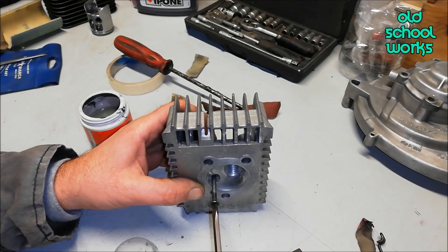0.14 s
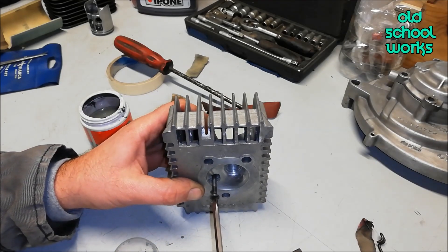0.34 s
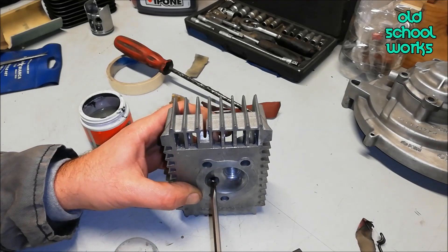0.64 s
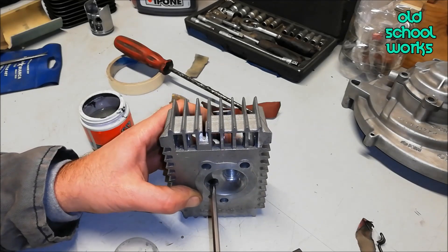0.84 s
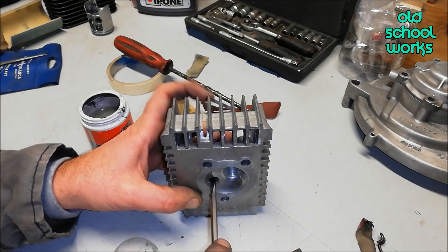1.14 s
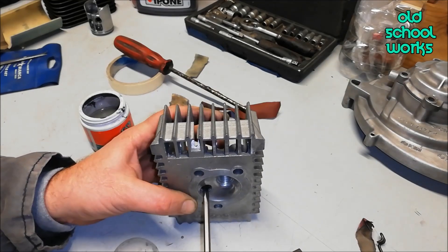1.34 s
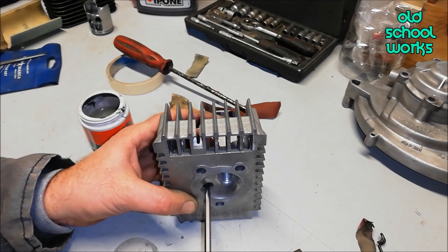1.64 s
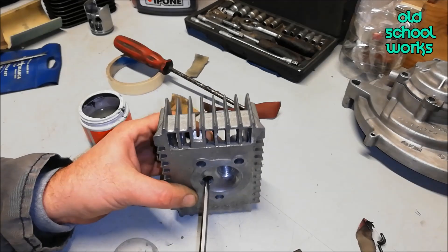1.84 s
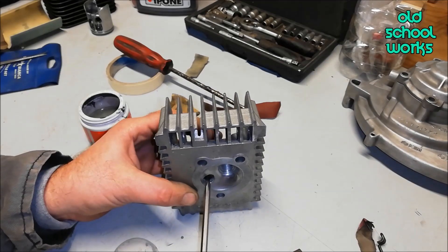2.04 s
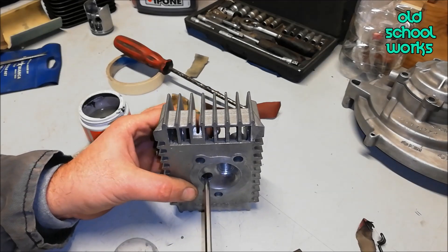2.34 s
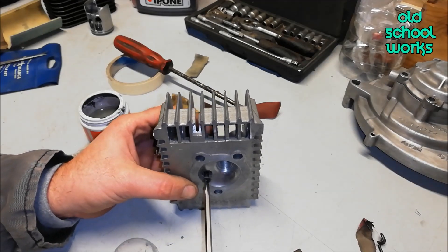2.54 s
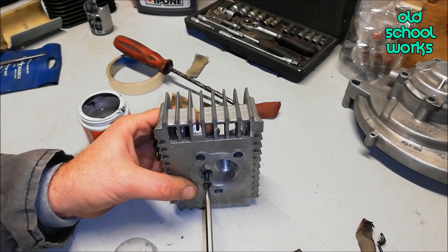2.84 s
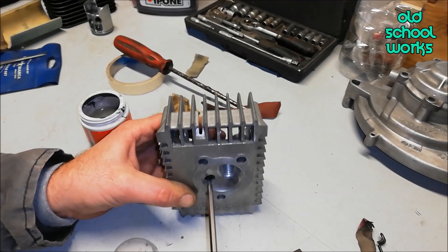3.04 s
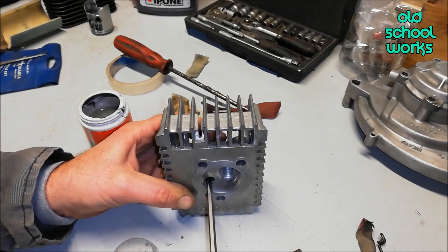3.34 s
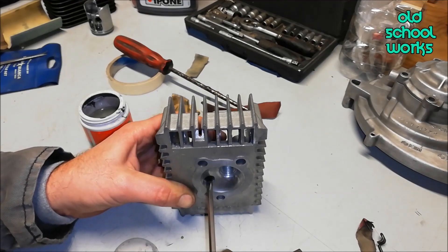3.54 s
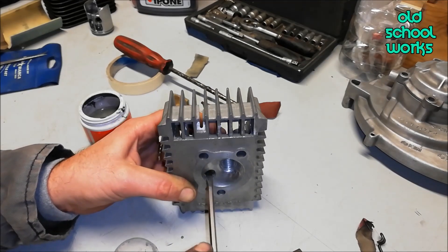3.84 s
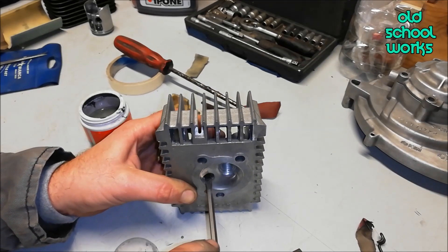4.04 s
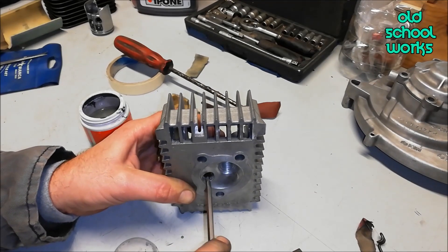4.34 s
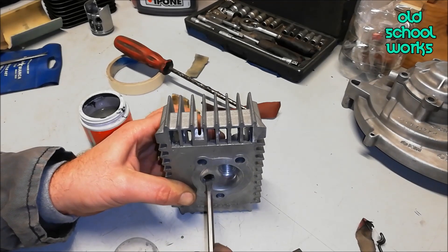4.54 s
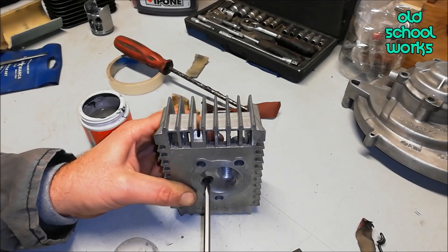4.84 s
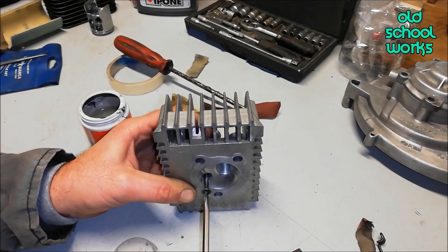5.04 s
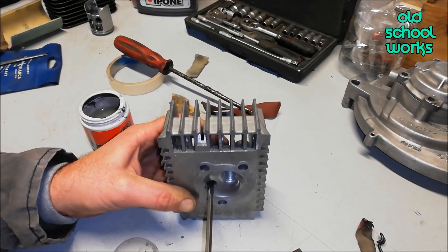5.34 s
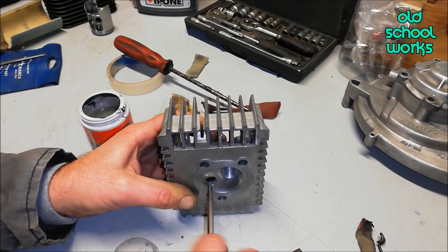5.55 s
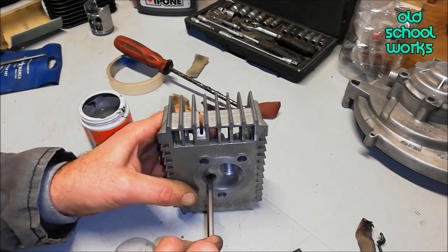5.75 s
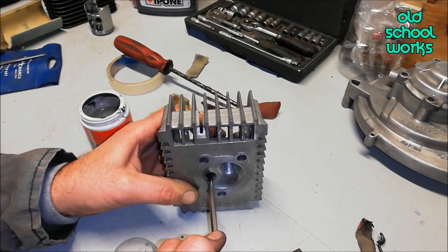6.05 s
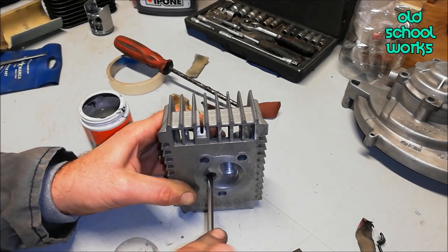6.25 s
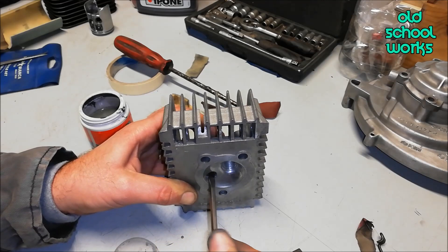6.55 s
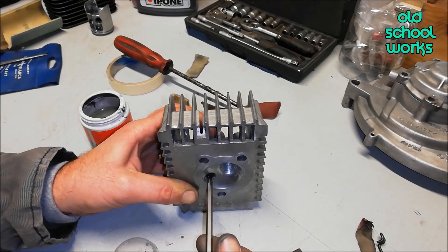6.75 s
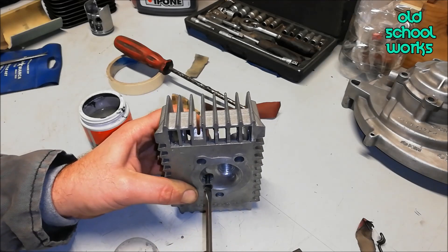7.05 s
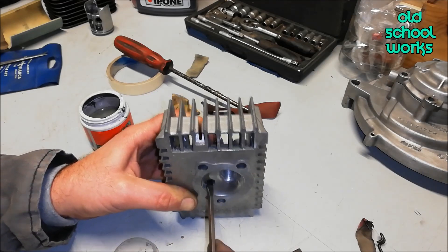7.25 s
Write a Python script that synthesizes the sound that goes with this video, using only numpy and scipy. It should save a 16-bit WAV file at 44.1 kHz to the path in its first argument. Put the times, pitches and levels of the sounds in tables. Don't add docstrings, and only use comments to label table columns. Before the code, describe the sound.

Close stereo pickup at a workbench: a finned metal casting is handled with light scrapes, ticks, small squeaks and woody knocks. A hard metallic clack opens a run of short, uneven gritty twists as a valve is ground in paste. Midway comes another clack and a bench thump, then more grinding and a final rattling clack with a bright ring. A far engine and soft traffic rumble lie behind.

```python
import sys
import numpy as np
from scipy import signal
from scipy.io import wavfile
from scipy.ndimage import uniform_filter1d

SR = 44100
rng = np.random.default_rng(int(sys.argv[2]) if len(sys.argv) > 2 else 0)


def digitize_waveform(pressure):
    field = np.atleast_2d(pressure).T
    bounded = np.clip(field, -1, 1)
    quanta = np.round(bounded * 32767).astype(np.int16)
    wavfile.write(sys.argv[1], SR, quanta)


def amplitude_ratio(level_db):
    exponent = np.asarray(level_db, float) / 20
    return 10 ** exponent


N = 326781

# (pitch_hz, width_hz, level_db)
VALVE_MODES = [(8220, 45, -8), (8420, 90, -2), (8670, 110, -6), (8880, 120, -8), (9080, 60, -5),
               (9350, 200, -15), (9600, 50, -8), (9810, 32, 4.5), (10095, 45, -3), (10550, 200, -10),
               (11100, 260, -11)]
# (pitch_hz, width_hz, level_db)
FIN_MODES = [(1340, 120, -9), (2200, 120, -9), (2510, 80, -10), (2860, 60, -6), (3580, 80, -7),
             (4000, 180, -9), (4430, 100, -10), (5070, 110, -11), (5790, 60, -4), (5960, 50, 0),
             (6290, 60, -4), (6430, 60, -4), (7270, 170, -5)]
# (pitch_hz, width_hz, level_db)
BENCH_MODES = [(92, 52, -4), (133.7, 30.3, -3), (217, 26, -7), (280, 38.5, 3.5), (397, 52, 3),
               (470, 39, -3), (693, 32, -2.5), (994, 65, 3), (1100, 84, -11.5), (1245, 67, -3)]
# (pitch_hz, level_db per Hz)
PASTE_HISS = [(590, -56), (1000, -12), (2480, -10.5), (2920, -14), (6100, -4.5), (7400, -11.5), (8400, 3),
              (10400, -14), (12200, -10), (15700, -10.5)]
# (pitch_hz, level_db per Hz)
DRY_HISS = [(880, -65), (1500, -3), (1770, -11.5), (2220, -14.5), (3070, -3.5), (3930, -3.5), (4550, -2.5),
            (8290, 3.5), (15700, -38.5)]
# (pitch_hz, level_db per Hz)
BENCH_THUD = [(47, -23), (80, -13), (454, 12.5), (604, -0.5), (952, 6.5), (1320, -11), (1680, -17),
              (2400, -15), (3120, -119), (5280, -120)]

# (modes, broad sound, broad sound dB, factor that widens the modes)
PASTED_VALVE = (VALVE_MODES, PASTE_HISS, -1.0, 1.0)
BARE_VALVE = (VALVE_MODES, DRY_HISS, 2.0, 1.5)
FINS = (FIN_MODES, DRY_HISS, -4, 1.0)
BENCH_TOP = (BENCH_MODES, BENCH_THUD, -1.5, 1.3)


def evened(x):
    return x / np.sqrt(np.mean(x ** 2) + 1e-20)


def slow_noise(window):
    return evened(uniform_filter1d(uniform_filter1d(rng.standard_normal(N), window), window))


def read(points, hz):
    f, value = np.transpose(points)
    return np.interp(np.log(hz + 1), np.log(f + 1), value)


def add(mix, s, sound):
    part = mix[round(s * SR):][:len(sound)]
    part += sound[:len(part)]


def highpass(x, hz, order=2):
    return signal.lfilter(*signal.butter(order, hz, "high", fs=SR), x)


def causal(gain, size):
    return np.fft.ifft(np.exp(np.conj(signal.hilbert(np.log(gain + 1e-5))))).real[:size]


def colour(points, size=2048):
    hz = abs(np.fft.fftfreq(4 * size, 1 / SR))
    return causal(amplitude_ratio(read(points, hz)), size)


def body(peaks, broad, broad_db, widen, vary_db=6.0):
    hz = abs(np.fft.fftfreq(16384, 1 / SR))
    modes = 0
    for f, width, db in peaks:
        power = amplitude_ratio(2 * (db + vary_db * rng.standard_normal()))
        modes = modes + power / (((hz ** 2 - f ** 2) / (f * width * widen)) ** 2 + (hz / f) ** 2)
    hiss = amplitude_ratio(2 * read(broad, hz))
    power = modes / modes.mean() + amplitude_ratio(2 * broad_db) * hiss / hiss.mean()
    response = causal(evened(np.sqrt(power)), size=4096)
    return response / np.linalg.norm(response)


def grit(per_s, spread_db, lump_db, lump_s):
    size = amplitude_ratio(spread_db * np.minimum(rng.exponential(1, N), 4)) * rng.choice([-1., 1.], N)
    lumps = signal.oaconvolve(rng.standard_normal(N), np.hanning(round(lump_s * SR)), "same")
    strikes = rng.random(N) < per_s / SR
    return evened(size * strikes * amplitude_ratio(lump_db * evened(lumps)))


def stroke(row, release_s, depth_db, gain_db):
    start, length, first_db, last_db, *second_db = row
    bite_s = 0.014
    s = start + np.cumsum([0, bite_s, max(length - bite_s, .001), release_s])
    db = np.array([first_db + depth_db, first_db, last_db, last_db + depth_db])
    lean = gain_db * np.array([-0.46, -1.12, -0.18, -0.29])
    return np.transpose([s, db] + [db + d + lean for d in second_db])


def rub(strokes, grains, parts, roam_s):
    t, out = np.arange(N) / SR, np.zeros((2, N))
    roam = t / roam_s + .5 * slow_noise(4000)
    forces = np.zeros((len(parts), N))
    for points in strokes:
        s, *levels = np.transpose(points)
        forces = np.maximum(forces, [amplitude_ratio(np.interp(t, s, db, -200, -200)) for db in levels])
    for place in range(3):
        here = (1 + np.cos(2 * np.pi * (roam + place / 3))) / np.sqrt(9 / 2)
        sound = np.zeros(N)
        for k, (force, part) in enumerate(zip(forces, parts)):
            own_grains = np.roll(grains, 4096 * k)
            sound += signal.oaconvolve(force * here * own_grains, body(*part))[:N]
        out += ports(sound, side_db=0.5)
    return out


def grinding():
    # (start_s, length_s, first_db, last_db, fins against the valve in dB)
    twists = [(3.307, 0.067, -77, -61, -21), (3.381, 0.24, -45, -42, -20), (3.669, 0.26, -45, -45.5, -10.5),
              (3.98, 0.12, -60.5, -68.5, -5), (4.213, 0.28, -53.5, -44, -5.5),
              (4.489, 0.32, -45, -54, -1.5), (4.853, 0.071, -64, -66, 2), (5.342, 0.31, -46, -41.5, -5.5),
              (5.625, 0.15, -41.5, -57.5, -3.5), (5.789, 0.12, -51.5, -44, -12),
              (6.127, 0.21, -56, -47, -13.5), (6.363, 0.27, -54.5, -55.5, 1.5),
              (6.594, 0.19, -54.5, -60.5, -12), (6.912, 0.16, -59, -58.5, 2.5)]
    strokes = [stroke(row, release_s=0.065, depth_db=-12.5, gain_db=4.5) for row in twists]
    grains = grit(per_s=5000, spread_db=2.0, lump_db=2.0, lump_s=0.016)
    return seated(rub(strokes, grains, [PASTED_VALVE, FINS], roam_s=0.37))


def seated(x):
    # (time_s, rim_db, fizz_db)
    fit = [(3.38, 3.5, 0), (3.6, 1.5, -1), (3.7, 1, -1), (3.95, 3.5, -4), (4.22, 7.5, -1), (4.5, 0, -1.5),
           (4.8, -3, -6), (5.35, 0, -1), (5.6, 1, 0), (5.8, 4.5, -2), (5.97, -5, -7), (6.13, 6.5, 1),
           (6.35, 3, 1), (6.55, 6, 0), (6.75, 0, -2), (6.92, -6, -7), (7.101, -1, -2)]
    s, rim_db, fizz_db = np.transpose(fit)
    t = np.arange(N) / SR

    def above(hz):
        return signal.oaconvolve(x, signal.firwin(255, hz, pass_zero=False, fs=SR)[None], "same", axes=1)

    rim, fizz = above(9350), above(11600)
    rim_gain, fizz_gain = amplitude_ratio(np.interp(t, s, rim_db)), amplitude_ratio(np.interp(t, s, fizz_db))
    return x - rim + rim_gain * (rim - fizz) + fizz_gain * fizz


def clacks():
    # (time_s, peak_db, ring_db, low_blow_db, freedom to ring as a factor)
    landings = [
        (1.2081, -38.5, 15, -16, 1),
        (3.056, -5, -9, -32, 0.63),
        (5.3025, -8.5, -6.5, -38, 0.38),
        (7.336, -5.5, -3, -3, 0.43),
    ]
    # (pitch_hz, level_db, time to fade by 60 dB in s)
    rings = [
        [(2778, -18, .12), (3564, -8, .15), (4000, -13, .05), (4425, -6, .06), (5965, -13, .11),
         (6288, -6, .14), (6433, 0, .06), (7477, -13, .13), (8210, -14, .11), (11770, -18, .1)],
        [(1050, -5, .05), (2200, -3, .05), (2536, -7, .2), (2860, -10, .07), (5792, -16, .25), (5965, 0, .12),
         (6288, -9, .15), (7354, -14, .18), (8220, -10, .2), (8414, -19, .22)],
        [(2848, -14, .15), (2200, -3, .05), (1300, -8, .05), (5965, -7, .12), (6288, -10, .1), (7477, -17, .12),
         (8215, -3, .4), (9033, -13, .13)],
        [(1090, -3, .09), (1420, -6, .05), (2600, -4, .04), (2860, -4, .16), (4161, -8, .08), (5039, -8, .1),
         (5965, -5, .08), (6288, -17, .14), (8215, -4, .55), (9798, -5, .1), (11300, -16, .06),
         (13160, -20, .07)],
    ]
    # (pitch_hz, level_db per Hz)
    crack_tone = [(350, 1), (700, 6.5), (1200, 6), (2400, 8), (3600, -1), (6000, 1), (8000, 0.5),
                  (10500, -6.5), (13500, -44), (15700, -14)]
    bench = body(*BENCH_TOP)
    out, t = np.zeros((2, N)), np.arange(SR // 3) / SR
    for (s, db, ring_db, low_db, free), modes in zip(landings, rings):
        fade = np.exp(-t / 0.0047) + 0.053 * np.exp(-t / 0.069)
        burst = rng.standard_normal(len(t)) * fade * (1 - np.exp(-t / 0.0002))
        burst[[0, 20, 60]] += [4, -6, 5]
        crack = signal.oaconvolve(burst, colour(crack_tone))[:len(t)]
        chatter = uniform_filter1d(rng.standard_normal((len(modes), len(t))), 160, axis=1)
        chatter = amplitude_ratio(3.8 * evened(chatter) * np.exp(-t / 0.14))
        ring = np.zeros(len(t))
        for (f, mode_db, t60), shake in zip(modes, chatter):
            fading = amplitude_ratio(mode_db - 60 * t / (free * min(t60, .8)))
            ring += shake * fading * np.sin(2 * np.pi * (f * t + rng.random()))
        ring = ring * (1 - np.exp(-t / 0.0006)) * signal.windows.tukey(2 * len(t), .3)[len(t):]
        landing = np.zeros(N)
        add(landing, s, amplitude_ratio(db) * (crack / abs(crack).max() + amplitude_ratio(ring_db) * ring / abs(ring).max()))
        add(landing, s, amplitude_ratio(db + low_db) * bench / abs(bench).max())
        out += ports(landing, side_db=-2.0)
    return out


def stem():
    # (time_s, level_db, time to fade by 60 dB in s)
    free_rings = [
        (.812, -60, 1),
        (3.057, -37, 0.94),
        (5.303, -38.5, 0.54),
        (7.337, -33.5, 0.51),
    ]
    out, t = np.zeros(N), np.arange(SR // 3) / SR
    grip = np.cos(np.pi / 2 * t / t[-1]) * np.minimum(t / 0.027, 1)
    for s, db, t60 in free_rings:
        add(out, s, amplitude_ratio(db - 60 * t / t60) * np.sin(2 * np.pi * 3413 * t) * grip)
    return out


def sliding():
    # (start_s, length_s, first_db, last_db, valve against the fins in dB)
    slides = [(0.12, 0.3, -73.5, -61, 1), (0.296, 0.27, -58.5, -61.5, -4.5), (0.495, 0.16, -54, -57, -5),
              (0.629, 0.18, -54, -49.5, -11), (0.9, 0.055, -70, -63, -3), (1.097, 0.12, -74, -67.5, 15),
              (1.556, 0.22, -73, -67, -8), (1.818, 0.15, -70.5, -59.5, -9), (1.963, 0.12, -72, -71, -11),
              (2.41, 0.18, -76, -80, 3), (2.561, 0.093, -54.5, -49.5, -3.5), (2.62, 0.15, -69, -66, -6),
              (2.965, 0.071, -64, -29.5, -26), (3.078, 0.12, -48, -61, -43), (4.922, 0.1, -67, -47.5, 1),
              (5.02, 0.15, -60.5, -84.5, 13), (5.163, 0.14, -65.5, -39, 0.5), (7.283, 0.061, -50, -40, 0)]
    strokes = [stroke(row, release_s=0.035, depth_db=-15, gain_db=-1.7) for row in slides]
    grains = grit(per_s=7000, spread_db=2.5, lump_db=1.5, lump_s=0.021)
    return rub(strokes, grains, [FINS, BARE_VALVE], roam_s=0.55)


def squeaks():
    # (start_s, length_s, pitch_hz, width_hz)
    songs = [(.147, .018, 4650, 120), (.26, .12, 8300, 150), (.42, .17, 6410, 40), (.5, .08, 8250, 150),
             (.5, .1, 4790, 41), (.66, .14, 8580, 120), (.68, .14, 3980, 140), (.72, .1, 7200, 190),
             (.74, .1, 272, 16), (.915, .06, 6350, 60), (.93, .045, 2780, 60), (.93, .04, 4430, 80),
             (.88, .13, 3413, 15), (1.26, .64, 254, 9), (1.3, .18, 7000, 80), (1.565, .065, 4900, 40),
             (1.57, .03, 8150, 60), (1.58, .05, 2530, 50), (1.629, .01, 7200, 300), (1.755, .03, 2530, 50),
             (1.85, .16, 2530, 60), (1.9, .06, 2860, 50), (1.92, .079, 220, 73), (1.93, .08, 8250, 50),
             (1.93, .08, 9150, 50), (1.93, .16, 5960, 50), (3.42, .2, 9810, 30), (3.44, .12, 1060, 60),
             (3.53, .11, 8300, 250), (3.6, .35, 255, 15), (3.87, .14, 8400, 120), (4.23, .2, 8300, 200),
             (4.68, .28, 140, 12), (4.965, .1, 2160, 160), (5.36, .14, 8350, 80), (5.57, .08, 8860, 120),
             (5.83, .1, 8400, 300), (6.13, .65, 9800, 35), (6.91, .23, 2080, 200), (7.345, .06, 2870, 40),
             (7.286, .05, 5960, 60), (7.308, .028, 8220, 60), (2.575, .1, 5960, 50), (2.58, .09, 2530, 80),
             (2.67, .1, 5960, 50), (4.4, .15, 4450, 60), (6.2, .2, 6290, 60), (5.24, .07, 2200, 300),
             (5.24, .07, 2860, 150), (2.43, .04, 8420, 80), (2.5, .05, 8420, 80), (2.42, .14, 5960, 50)]
    song_db = [-59, -68, -60, -54, -61, -52.5, -59, -58, -46.5, -62, -68, -64, -64, -57.5, -71, -62.5, -62,
               -68, -50, -65, -62, -55, -38, -67, -68, -74, -64, -61, -47, -62.5, -42.5, -50.5, -49, -46,
               -48.5, -47, -45.5, -59, -57, -56, -45, -42, -48.5, -56, -66, -58, -54, -50, -47, -66, -66,
               -72]
    out = np.zeros(N)
    for (s, length, hz, width), db in zip(songs, song_db):
        t = np.arange(0, length, 1 / SR)
        mode = np.exp(-np.pi * width * t) * np.sin(2 * np.pi * hz * t)
        sung = signal.oaconvolve(rng.standard_normal(2 * SR), mode, "valid")[:len(t)]
        add(out, s, amplitude_ratio(db) * evened(sung) * signal.windows.tukey(len(t), .7))
    return out


def ticks():
    # (time_s, peak_db, valve_part_db)
    snaps = [(0.199, -42, -13), (0.214, -41, -7), (0.406, -40, 2), (0.8144, -41, -17), (0.953, -38, 2),
             (1.101, -30, 2), (1.1225, -33, 0), (1.153, -26, 0), (1.632, -44, -1), (2.576, -63, -19),
             (3.39, -28, -1), (3.763, -25, 0), (3.9135, -44, 3), (4.0549, -35, 4), (4.08, -42, 0),
             (4.211, -36, 6), (4.2353, -31, 0), (4.2934, -49, -5), (4.3448, -48, -7), (4.669, -25, 0),
             (4.8279, -30, -3.5), (6.1326, -60, 9), (7.2997, -28, 7)]
    valve, fins = body(*PASTED_VALVE), body(*FINS)
    out, t = np.zeros(N), np.arange(900) / SR
    fade = np.exp(-t / 0.0019) + 0.32 * np.exp(-t / 0.0074)
    for s, db, valve_db in snaps:
        share = np.clip(amplitude_ratio(valve_db), 0, 1)
        crumbs = rng.standard_normal(900)
        crumbs[0] = 5
        tick = np.convolve(share * valve + (1 - share) * fins, crumbs * fade)
        add(out, s, amplitude_ratio(db - 2) * tick / abs(tick).max())
    return out


def knocks():
    # (time_s, peak_db, treble_db,
    # deep_modes_db, damping as a factor)
    blows = [(0.244, -47, -34, 7, 0.57), (0.4187, -23, -17.5, -2.5, 1.9), (0.46, -25.5, -18.5, 12, 1.34),
             (0.501, -35, -30, 6, 0.71), (0.572, -38, -30, -1.5, 0.62), (0.689, -30.5, -37, -4.5, 1.3),
             (0.711, -27.5, -24, 5, 2.7), (1.271, -24, -24, 7, 1.46), (1.477, -29, -25, 4, 0.92),
             (1.672, -29.5, -30, 1.5, 0.65), (1.794, -34, -24, 0.5, 0.75), (1.935, -23.5, -27, -3, 1.3),
             (3.058, -26.5, -28, -16, 0.71), (2.202, -28.5, -32, 3, 0.91), (2.685, -27.5, -21, 5.5, 1.46),
             (2.747, -29.5, -24, 6, 1.9), (2.779, -32, -28, 7, 0.85), (3.22, -26.5, -22, -2, 1.34),
             (4.062, -39, -27, 2.5, 1.05), (4.622, -24.5, -26, -3, 1.5), (5.076, -28, -22, 1, 1.66),
             (5.208, -27.5, -29, -15, 1), (5.5212, -20.5, -28, -15, 0.98), (5.687, -34, -37, -8, 1.15),
             (5.711, -32, -41, -7, 0.66), (6.175, -41.5, -17, -9, 1.3), (6.828, -43, -18, 1, 0.97),
             (7.307, -29, -32, -5, 2.1), (7.3149, -22.5, -33, -11, 1.3), (7.3232, -16.5, -41, -14, 0.94),
             (4.64, -30, -33, -8, 0.87), (3.682, -40, -21, 6, 0.68), (7.309, -32, -28, -5, 2.6),
             (7.319, -23, -34, -7, 3.6), (7.328, -25, -45, -6, 1.5), (3.041, -25, -10, -10, 0.51),
             (3.019, -27, -9, -14, 0.46), (5.2948, -17, 10, -15, 2.7), (7.352, -29.5, -32, 0, 0.47)]
    out, t = np.zeros(N), np.arange(6000) / SR
    for s, db, high_db, deep_db, damping in blows:
        rings = np.zeros(len(t))
        for f, width, mode_db in BENCH_MODES:
            uneven_db = 6 * (rng.random() - .5)
            shift = 1 + .1 * (rng.random() - .5)
            level_db = mode_db + uneven_db + (high_db + 22.0) * f / 1000 + deep_db * (f < 240)
            fade = np.exp(-np.pi * width * abs(damping) * (0.58 + f / 900) * t)
            rings += amplitude_ratio(level_db) * fade * np.sin(2 * np.pi * f * shift * t)
        rings = rings * (1 - np.exp(-t / 0.00094))
        rings /= -abs(rings).max()
        add(out, s, amplitude_ratio(db) * rings)
        add(out, s + .005 + .006 * rng.random(), -amplitude_ratio(db - 9) * rings)
    return out


def dragging():
    # (start_s, length_s, first_db, last_db)
    shuffles = [(0.651, 0.13, -58.5, -49), (1.248, 0.021, -38, -44.5), (1.656, 0.23, -58, -55),
                (1.848, 0.11, -52.5, -40.5), (2.568, 0.037, -54, -43.5), (2.606, 0.054, -42.5, -50),
                (2.976, 0.067, -52.5, -36), (4.628, 0.042, -43.5, -54), (4.679, 0.044, -51.5, -49),
                (4.96, 0.061, -55, -41), (5.167, 0.032, -51, -43.5), (5.21, 0.073, -39, -35.5),
                (5.309, 0.12, -63, -48), (5.666, 0.037, -47, -52), (6.813, 0.049, -69, -57),
                (7.285, 0.027, -50.5, -33.5)]
    strokes = [stroke(row, release_s=0.055, depth_db=-21, gain_db=0) for row in shuffles]
    grains = grit(per_s=3000, spread_db=1.5, lump_db=-0.25, lump_s=0.0075)
    return highpass(rub(strokes, grains, [BENCH_TOP], roam_s=0.079), 170)


def ports(x, side_db, echo_s=0.0045, lead=0.2):
    t = np.arange(-256, 257) / SR
    paths = rng.standard_normal(len(t)) * np.exp(-abs(t) / echo_s)
    paths = paths / np.linalg.norm(paths) - lead * np.sign(t) * np.exp(-abs(t) / 0.000068)
    paths = signal.filtfilt(*signal.butter(2, 480, "high", fs=SR), paths - 0.85 * paths[::-1])
    side = amplitude_ratio(side_db) * signal.oaconvolve(x, paths / np.linalg.norm(paths), "same")
    side = side - 0.44 * signal.lfilter(*signal.butter(1, [450, 1500], "band", fs=SR), x)
    return np.array([x + side, x - side])


def scatter(x, spread_db=-7, above_hz=4000):
    sway = evened(signal.oaconvolve(rng.standard_normal(N), np.hanning(600), "same"))
    side = amplitude_ratio(spread_db) * sway * highpass(x.mean(0), above_hz, order=1)
    return x + np.array([side, -side])


def shop(x, t60=0.5, dull_hz=5000, thin_hz=350):
    taps = np.zeros((2, SR // 2))
    at = np.arange(150, SR // 2 - 20, 20) + rng.integers(0, 20, (2, (SR // 2 - 151) // 20))
    np.put_along_axis(taps, at, rng.choice([-1., 1.], at.shape), 1)
    hz, t, z = signal.stft(taps, SR, nperseg=512)
    fade = amplitude_ratio(-60 * t / t60 * (2.0 + hz[:, None] / dull_hz))
    z = z * fade / (1 + (thin_hz / (hz[:, None] + 1)) ** 2)
    tail = signal.istft(z, SR, nperseg=512)[1]
    return signal.fftconvolve(x[None], tail / np.linalg.norm(tail[0]), axes=1)[:, :N]


def engine():
    # (time_s, firing_hz, load_db)
    running = [(1.74, 51.4, -62), (2.02, 51.2, -38.5), (2.18, 41.7, -42), (2.44, 34.64, -63),
               (2.8, 33.62, -54.5), (3.18, 36.25, -63), (3.441, 38.7, -41.5), (3.56, 41.3, -41),
               (3.74, 44.4, -45.5), (3.85, 41.8, -37.5), (4.27, 47.23, -52), (4.43, 45.25, -43),
               (4.84, 47.6, -57.5), (6.13, 51.24, -55.5), (6.37, 49.44, -53), (6.58, 51.0, -87),
               (7.4, 52, -63)]
    s, hz, load_db = np.transpose(running)
    octave_db = -57.5 + 0.33 * (load_db + 43.5) + 0.25 * (hz - 45)
    t = np.arange(N) / SR
    wander = slow_noise(3000)
    turns = np.cumsum(np.interp(t, s, hz) * (1 + 0.011 * wander)) / SR
    out = np.zeros(N)
    for order, db in [(1, load_db), (2, octave_db)]:
        level = np.sqrt(2) * amplitude_ratio(np.interp(t, s, db) + 2.7 * wander[::-1])
        out += level * np.sin(2 * np.pi * order * turns)
    return np.clip((t - s[0]) / 0.3, 0, 1) * out


def air():
    # (pitch_hz, level_db per Hz)
    air_tone = [(12, -22), (20, 1), (77, 2), (120, 0.5), (177, -12), (270, -7), (590, -22.5), (1090, -17),
                (1440, -17), (5380, -20.5), (8180, -17.5), (14700, -30.5), (16000, -19)]
    # (time_s, swell_db)
    passing = [
        (0.0, 2),
        (0.7, 2.5),
        (1.01, 2),
        (1.73, 6),
        (2.58, 4),
        (2.72, 4),
        (5.3, 14),
        (7.04, 7.5),
        (7.41, 6.5),
    ]
    # (pitch_hz, likeness from -1 to 1)
    likeness = [(25, 1), (60, 1), (240, 0.72), (950, 0.03), (3770, -0.068), (15000, -0.12)]
    frames, hz = N // 512 + 5, np.fft.rfftfreq(2048, 1 / SR)
    a, b, c, d, patches = rng.standard_normal((5, len(hz), frames))
    patches = evened(uniform_filter1d(uniform_filter1d(patches, 12, 0), 6, 1))
    s, swell_db = np.transpose(passing)
    t = np.arange(frames) * 512 / SR
    rumble = 1 / (1 + (hz[:, None] / 300) ** 2)
    wash = (1 - rumble) / (1 + (hz[:, None] / 4000) ** 4)
    swell = (0.89 * rumble + 1.233 * wash) * np.interp(t, s, swell_db)
    same = np.clip(read(likeness, hz), -1, 1)[:, None]
    left = a + 1j * b
    right = same * left + np.sqrt(1 - same ** 2) * (c + 1j * d)
    z = np.array([left, right]) * amplitude_ratio(read(air_tone, hz)[:, None])
    still = signal.istft(z, nperseg=2048, noverlap=1536)[1].std()
    moving = signal.istft(z * amplitude_ratio(swell + 2.4 * patches), nperseg=2048, noverlap=1536)[1][:, :N]
    return amplitude_ratio(-61 - 1.5) / still * moving


def scene():
    small = knocks() + ticks() + squeaks() + stem()
    near = grinding() + sliding() + dragging() + clacks() + ports(small, side_db=-4.5)
    near = highpass(near, 95)
    return amplitude_ratio(-4.0) * scatter(near) + amplitude_ratio(-12.0) * shop(near.mean(0)) + engine() + air()


def band_limit(x):
    return signal.sosfilt(signal.butter(12, 16340, fs=SR, output="sos"), x)


def record(dry):
    edge = signal.firwin(2047, 15790, window=("kaiser", 9), fs=SR)
    limited = signal.oaconvolve(dry, edge[None], "same", axes=1)
    return band_limit(limited)


dry = scene()
out = record(dry)
digitize_waveform(out)
```